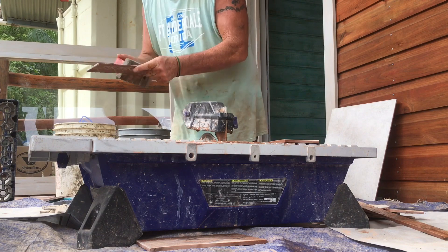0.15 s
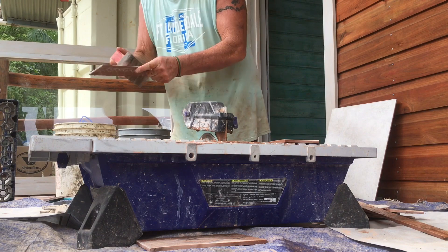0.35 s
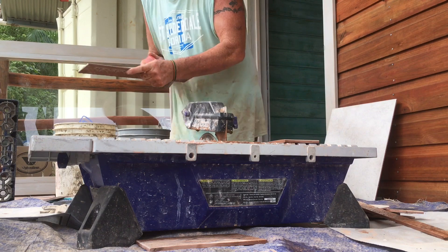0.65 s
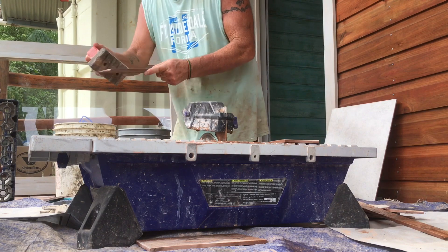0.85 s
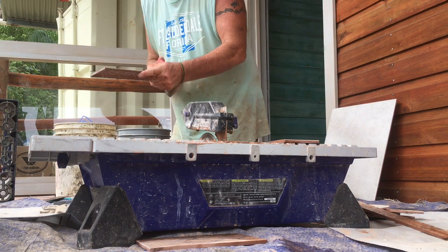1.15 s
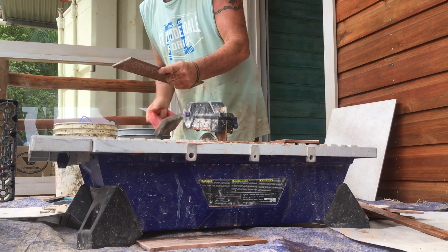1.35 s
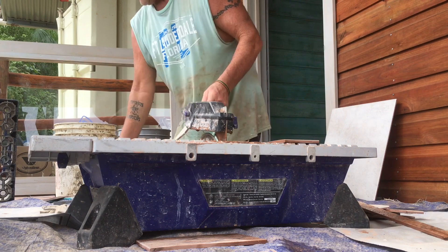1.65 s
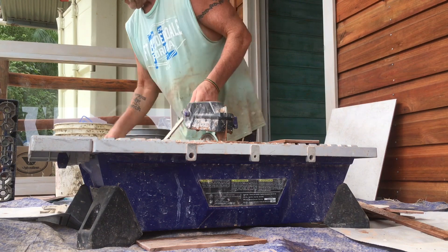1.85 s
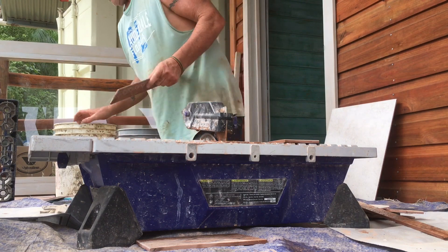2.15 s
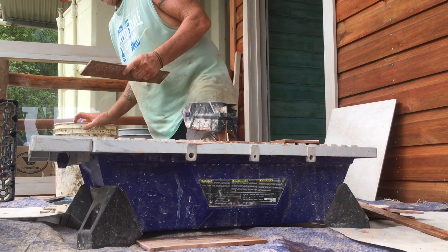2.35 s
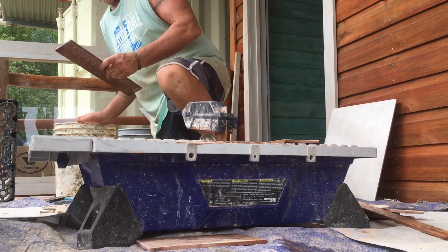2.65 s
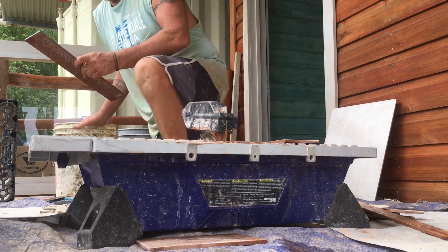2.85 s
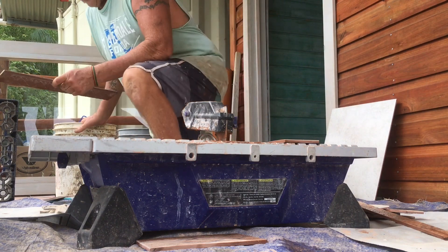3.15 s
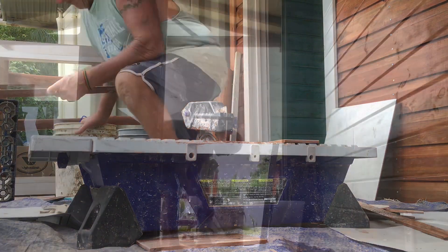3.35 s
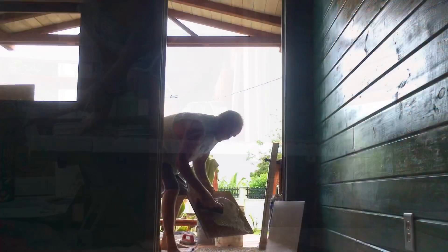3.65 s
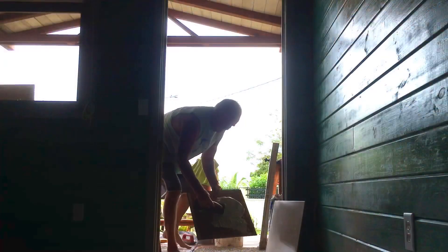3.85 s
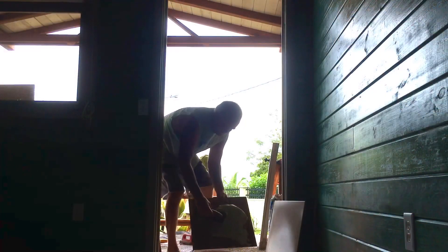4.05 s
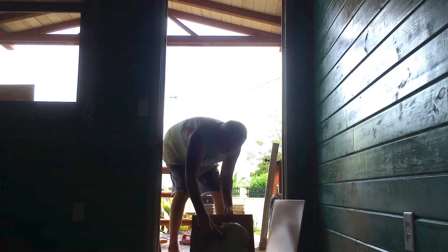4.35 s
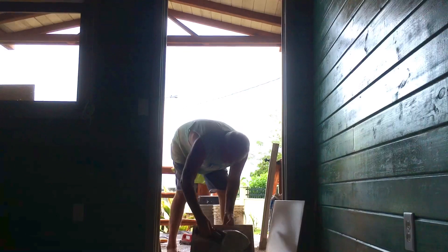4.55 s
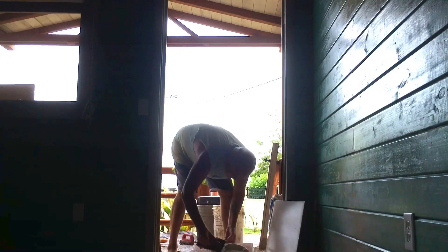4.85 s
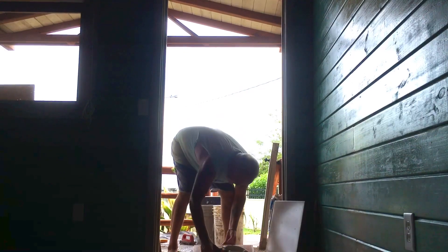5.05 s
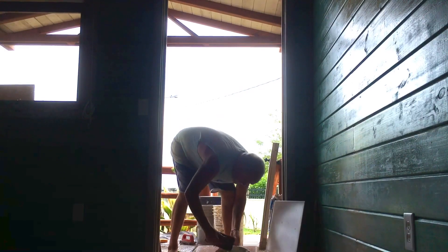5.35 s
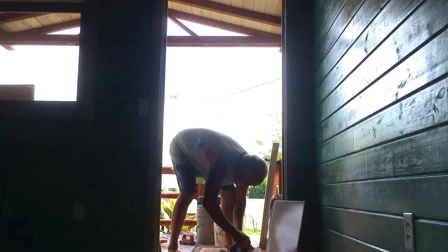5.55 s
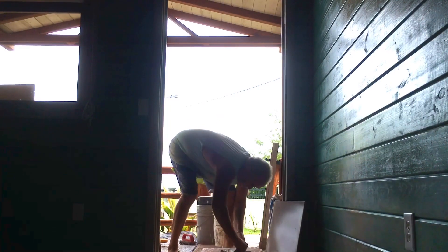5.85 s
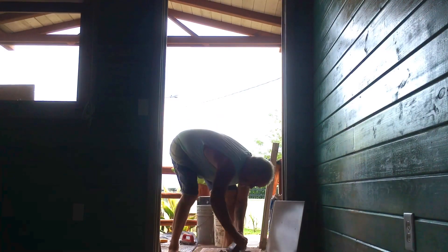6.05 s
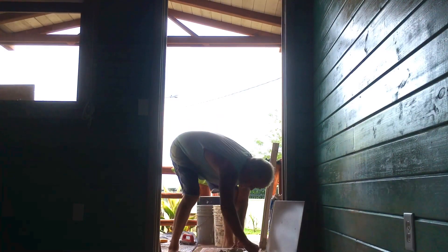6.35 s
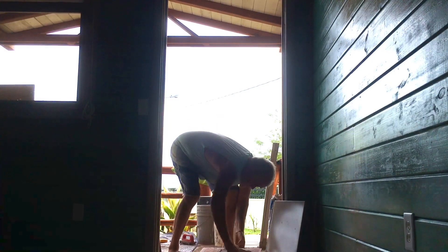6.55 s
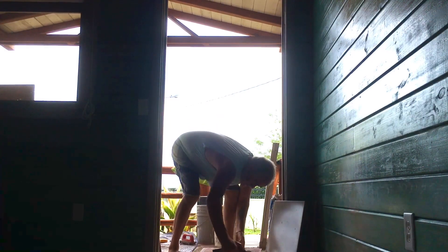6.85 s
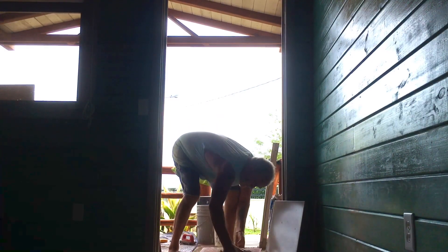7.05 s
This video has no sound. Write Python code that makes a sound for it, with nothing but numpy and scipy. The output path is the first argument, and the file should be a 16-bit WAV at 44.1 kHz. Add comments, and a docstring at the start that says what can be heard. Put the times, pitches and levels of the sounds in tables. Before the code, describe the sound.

From the start to about 1.4 seconds, a rubbing stone makes four quick gritty strokes along a tile's edge, with a bright, shifting ring. A low engine drones over outdoor porch rumble, rising slightly in pitch, then sinking and fading by 3.8 seconds. Around 1.7 and 1.8 seconds the stone knocks dully onto a bench, followed by soft rustling swells of hiss and a tiny tap at 2.5. Between 3.2 and 3.8 seconds the porch fades into a wooden room with a quiet mains hum. A faint whirr and very faint, high falling chirps come between about 3.8 and 5 seconds. At 4.35 a slab hits the floor with a loud clack and rattles flat as the floorboards boom. Four short gritty scrapes follow near 5.0, 5.7, 6.4 and 7.0 seconds, with softer thuds, a smaller clatter at 5.8 and a short room echo.

```python
"""Rubbing a tile, then a dropped slab

On a porch a rubbing stone is drawn four times along a tile's edge, its grit making the tile ring,
and is put down on a bench while an engine drones by. The porch fades into a wooden room with a
mains hum. A slab drops and rattles flat, the floorboards thud, and a gritty surface is wiped in
four strokes. Under it all are swells of fine hiss, a faint whirr and a few high chirps."""
import sys
import numpy as np
from scipy import signal
from scipy.fft import rfft, irfft
from scipy.io import wavfile
from scipy.ndimage import uniform_filter1d

SR = 44100
rng = np.random.default_rng(int(sys.argv[2]) if len(sys.argv) > 2 else 0)


def output_pcm(signal):
    """Save a mono or channel-first signal as 16-bit PCM at the path in sys.argv[1].

    Samples are clipped to [-1, 1] before scaling.
    """
    pcm = np.clip(np.atleast_2d(signal).T, -1, 1) * 32767
    wavfile.write(sys.argv[1], SR, np.round(pcm).astype(np.int16))


N = 317079
TIME = np.arange(N) / SR


def amp(db):
    """Turns decibels into a factor to multiply by."""
    return 10 ** (np.asarray(db) / 20)


def unit_level(x):
    """Scales x to an average (RMS) level of one."""
    return x / np.sqrt(np.mean(x ** 2) + 1e-20)


def look_up(points, hz):
    """Reads a list of (frequency, value) points at the frequencies hz."""
    f, value = np.transpose(points)
    return np.interp(np.log(hz + 1), np.log(f + 1), value)


def curves(rows):
    """Joins rows that start with a time into a time axis and one curve per further column."""
    times, *columns = np.transpose(rows)
    t = np.arange(times[0], times[-1], 1 / SR)
    return [t] + [np.interp(t, times, column) for column in columns]


def add(mix, start, sound):
    """Adds a sound to the mix, start seconds in."""
    part = mix[round(start * SR):][:len(sound)]
    part += sound[:len(part)]


def colour(x, spectrum):
    """Filters x by (frequency, dB) points and sets its level to one."""
    gain = amp(look_up(spectrum, np.fft.rfftfreq(len(x), 1 / SR)))
    return unit_level(irfft(rfft(x) * gain, len(x)))


def resonate(x, hz, width):
    """Makes x ring around hz, which may glide; a smaller width (Hz) rings longer."""
    spin = np.exp(2j * np.pi * np.cumsum(hz * np.ones(len(x))) / SR)
    decay = np.exp(-np.pi * width / SR)
    return 2 * (spin * signal.lfilter([1 - decay], [1, -decay], x / spin)).real


def wander(length, per_s):
    """A smooth random curve of size one that changes about per_s times a second."""
    size = max(int(SR / per_s), 2)
    return unit_level(uniform_filter1d(uniform_filter1d(rng.standard_normal(length), size), size))


def grit(length, spread_db, flicker_db, per_s):
    """Dense grains of uneven size under a flickering pressure."""
    grain_db = spread_db * np.minimum(rng.exponential(1, length), 4)
    sizes = amp(grain_db + flicker_db * wander(length, per_s))
    return unit_level(rng.standard_normal(length) * sizes)


def tilt(x, treble_db):
    """Tips the balance between what lies above and below 4 kHz."""
    low = signal.sosfilt(signal.butter(1, 4000, fs=SR, output="sos"), x)
    return (low + amp(treble_db) * (x - low)) / np.sqrt((1 + amp(2 * treble_db)) / 2)


def stone_on_tile():
    """Grit rings the tile; as stone and grip shift, each of its tones swells, fades and bends."""
    # strokes: start/s, length/s, place of hardest push/0-1, push level/dB, start level/dB, treble/dB
    rubs = [(0.0, 0.2813, 0.36, -17.5, -42, 1.5), (0.289, 0.2972, 0.57, -18, -40.5, 0),
            (0.567, 0.37, 0.45, -17, -39, 3.5), (0.94, 0.35, 0.48, -14.5, -40, 3)]
    # the tones the tile rings at: f/Hz
    tile_hz = [1150, 1280, 1407, 1547, 1800, 2250, 2696, 3225, 3572, 3962, 4243, 4560, 4865, 5454, 5808,
               6015, 6285, 6780, 6925, 7445, 8215, 9190, 9640, 10200, 11150, 12400, 12800, 13600, 15100]
    # for each of those tones: twice its width/Hz, relative level/dB
    tile_tones = [(49.1, -20.5), (50, -2.5), (68, -3.5), (50, -3), (80, -9), (80, -8.5), (72, -1),
                  (70, -11), (66, -8), (60.4, -5), (40, -16), (75, -10.5), (70, -14), (50, -9),
                  (90.7, -6.5), (45, -5), (45, -6.5), (60, -3.5), (60, -10.5), (26, -5), (139, -12.5),
                  (100, -8), (82, -14.5), (50, -27.5), (170, -14.5), (60, -15), (90, -16.5), (240, -16.5),
                  (230, -19.5)]
    # the hiss between the tones: f/Hz, relative level/dB
    grit_spectrum = [(210, -55.5), (350, -27), (1120, -4.5), (1380, -5), (2350, -6.5), (2750, -13.5),
                     (3030, -9.5), (4110, -10), (5140, -14.5), (6850, -9), (16000, -20.5)]
    bite_db_per_s, ease_db_per_s, lift_db_per_s, end_db = 327, 51, 292, -40.5
    t = TIME[:round(1.45 * SR)]
    start, length, place, push_db, start_db, bright_db = np.transpose(rubs)[:, :, None]
    bite_db = start_db + bite_db_per_s * (t - start)
    middle_db = push_db - ease_db_per_s * abs(t - start - place * length)
    lift_db = end_db + lift_db_per_s * (start + length - t)
    strokes_db = np.minimum(middle_db, np.minimum(bite_db, lift_db))
    level_db, stroke = strokes_db.max(0), strokes_db.argmax(0)  # the loudest stroke takes over
    dulling_db = 0.24 * np.maximum(level_db - push_db, -40)  # a lighter push sounds duller
    treble_db = (bright_db + dulling_db)[stroke, np.arange(len(t))]
    grip_db = 1.4 * rng.standard_normal((len(tile_tones), len(rubs)))  # new for each stroke
    grains = grit(len(t), spread_db=0.5, flicker_db=1.0, per_s=163)
    out = amp(level_db - 4.5) * colour(grains, grit_spectrum)
    for k, (hz, (double_width, db)) in enumerate(zip(tile_hz, tile_tones)):
        swing_db = 4.2 * wander(len(t), 34)
        bend = 1 + 0.0049 * wander(len(t), 9.5)
        drive = amp(level_db + swing_db + grip_db[k, stroke]) * grains
        width = double_width / 2
        size = np.sqrt(np.mean(resonate(grains, hz, width) ** 2) / double_width)
        out += (-1) ** k * amp(db - 29) * resonate(drive, hz * bend, width) / size
    return np.pad(tilt(out, treble_db), (0, N - len(t)))


def engine():
    """An engine drones at one, two and three times its firing rate, with a slight flutter."""
    # the passing engine: t/s, firing rate/Hz, first tone/dB, second tone/dB
    drone = [(0.0, 72.0, -35, -39), (0.05, 71.8, -32.5, -41.5), (0.31, 71.7, -29, -33.5),
             (0.62, 76.7, -24, -36), (0.82, 82.34, -33.5, -44.5), (0.95, 81.4, -27.5, -35),
             (1.3, 85.6, -37.5, -44.5), (1.47, 85.62, -20.5, -41), (1.61, 86.5, -29, -61),
             (1.7, 81.6, -36, -46), (1.75, 81.1, -33, -35.5), (2.04, 84.4, -32, -50), (2.4, 80.6, -26, -37),
             (2.62, 75.0, -26.5, -40.5), (2.87, 75.0, -26, -36), (2.97, 73.6, -26, -45.5),
             (3.33, 64.16, -29, -34.5), (3.52, 60.77, -42.5, -47), (3.78, 58.5, -49, -44),
             (3.8, 58.7, -39, -67)]
    exhaust_hz, exhaust_width_hz = 260, 10
    t, hz, first_db, second_db = curves(drone)
    turns = np.cumsum(hz * (1 + 0.0041 * wander(len(t), 13))) / SR
    # the third tone comes and goes, and is strongest near the exhaust's own pitch
    off_pitch = (3 * hz - exhaust_hz) / exhaust_width_hz
    third_db = -43 - 20 * np.log10(1 + off_pitch ** 2) + 2.5 * wander(len(t), 5.8)
    out = np.zeros(len(t))
    for multiple, db in enumerate([first_db, second_db, third_db], 1):
        level = np.sqrt(2) * amp(db + 0.79 * wander(len(t), 23))
        out += level * np.sin(2 * np.pi * (multiple * turns + rng.random()))
    fade_out = np.clip((t[-1] - t) / 0.17, 0, 1)
    return np.pad(out * fade_out, (0, N - len(t)))


def air(spectrum, db, patchy_db):
    """Background noise with drifting louder and softer patches."""
    frames, hz = N // 512 + 5, np.fft.rfftfreq(2048, 1 / SR)
    real, imag, patches = rng.standard_normal((frames, len(hz), 3)).T
    patches = uniform_filter1d(patches, size=20, axis=0)  # smooth across pitch
    patches = unit_level(uniform_filter1d(patches, size=8, axis=1))  # and across time
    spectra = (real + 1j * imag) * amp(look_up(spectrum, hz)[:, None] + patchy_db * patches)
    return amp(db) * unit_level(signal.istft(spectra, nperseg=2048, noverlap=1536)[1][:N])


def yard_air():
    """The low outdoor rumble around the porch."""
    # outdoor noise: f/Hz, relative level/dB
    spectrum = [(12, -48.5), (20, -25), (32, -17.5), (55, -5.5), (81, -12), (98, -14), (120, -11.5),
                (158, -12), (446, -29), (1030, -31.5), (1400, -35), (2320, -39), (4940, -48),
                (11400, -52.5), (16000, -60.5)]
    return air(spectrum, db=-36.5, patchy_db=2.0)


def hiss_swells():
    """Swells of fine, grainy hiss: cloth rustles, the clatter's bright hiss, the first wipe's tail."""
    # swells: peak t/s, level/dB, time to rise 20 dB/s, time to fall 20 dB/s
    swishes = [(1.7, -40.5, 0.026, 0.056), (1.82, -43, 0.022, 0.055), (2.32, -42, 0.24, 0.11),
               (2.55, -51, 1.19, 0.99), (2.82, -40.5, .12, .11), (3.17, -52, .04, 0.17),
               (3.61, -53.5, 0.058, .1), (3.77, -59, .04, 0.053), (3.88, -49.5, 0.068, .08),
               (4.0, -57, .2, 0.58), (4.18, -47, .06, 0.38), (4.36, -51, .02, 0.16),
               (4.555, -53.5, 0.067, .08), (4.75, -58.5, .5, 0.66), (5.4, -49, 0.26, 0.57)]
    # the tone colour of the hiss: f/Hz, relative level/dB
    spectrum = [(1470, 2.5), (2500, -2), (3080, -4), (4840, -8), (8940, -2.5), (10400, -5.5), (11100, -2.5),
                (14200, -4), (16000, 3)]
    swells = sum(amp(db - 20 * np.maximum((peak - TIME) / rise, (TIME - peak) / fall))
                 for peak, db, rise, fall in swishes)
    return swells * colour(grit(N, spread_db=3.0, flicker_db=1.3, per_s=60), spectrum)


def bench_knocks():
    """Stone and hand meet the bench: a short dull ring of two close tones, and a scuff."""
    # knocks: t/s, ring level/dB, f/Hz, time to fall 60 dB/s, relative scuff level/dB
    knocks = [(1.685, -35.5, 577, .08, -24), (1.696, -29.5, 1419, 0.031, -28),
              (1.71, -47, 1470, 0.044, -31), (1.82, -23, 883, 0.057, -26.5), (1.829, -31, 1636, 0.04, -29),
              (1.835, -18.5, 288.4, 0.15, -45.), (2.519, -40, 1235, 0.061, -51)]
    out, t = np.zeros(N), np.arange(8000) / SR
    for start, db, hz, ring_s, scuff_db in knocks:
        partner = 0.51 * np.sin(2 * np.pi * hz * 1.13 * t) * amp(-60 * t / 0.23)
        ring = amp(db - 60 * t / ring_s) * (np.sin(2 * np.pi * hz * t) + partner)
        noise = unit_level(resonate(resonate(rng.standard_normal(len(t)), 890, 1500), 930, 2750))
        scuff = 0.476 * amp(scuff_db - 60 * t / 0.064) * noise
        add(out, start, np.minimum(t * hz / 0.59, 1) * (ring + scuff))
    return out


def reverb(x):
    """The echo of x: a tail of noise in which each pitch dies at its own speed."""
    # length of the echo: f/Hz, time to fall 60 dB/s
    echo_times = [(100, 0.58), (500, 0.71), (2000, 0.41), (4000, 0.37), (8000, 0.103)]
    hz, t, spectra = signal.stft(rng.standard_normal(SR // 2), SR, nperseg=256)
    decay = amp(-60 * t / look_up(echo_times, hz)[:, None])
    tail = signal.istft(spectra * decay, SR, nperseg=256)[1]
    return signal.fftconvolve(x, tail / np.linalg.norm(tail))[:N]


def room_air_and_hum():
    """Steady mains tones over the room's low background noise."""
    # mains hum: f/Hz, level/dB
    tones = [(59.2, -46.5), (177.6, -58), (296.1, -54.5)]
    # indoor noise: f/Hz, relative level/dB
    spectrum = [(25, -12), (55, -1), (95, -3), (134, -6), (221, -12.5), (295, -13.5), (450, -23),
                (800, -22.5), (1300, -24), (2200, -31.5), (3500, -38.5), (5000, -45.5), (9000, -47.5),
                (16000, -57)]
    hum = sum(np.sqrt(2) * amp(db) * np.sin(2 * np.pi * (hz * TIME + rng.random())) for hz, db in tones)
    return hum + air(spectrum, db=-41.5, patchy_db=1.16)


def whirr():
    """A faint, narrow band of noise that rises a little in pitch."""
    # the whirr's course: t/s, f/Hz, level/dB
    course = [(3.8, 1500, -61), (3.95, 1555, -63), (4.2, 1567, -49.5), (4.3, 1560, -65)]
    out = np.zeros(N)
    t, hz, db = curves(course)
    band = resonate(resonate(rng.standard_normal(len(t)), hz, 148), hz, 173)
    add(out, t[0], amp(db) * unit_level(band))
    return out


def chirps():
    """Faint, very high whistles of noise that slide downward."""
    # chirps: start/s, length/s, level at the middle/dB
    whistles = [(3.86, .14, -72), (4.03, .1, -66), (4.174, 0.15, -69), (4.486, 0.123, -65),
                (4.698, .18, -60.5), (4.847, .11, -67)]
    start_hz, fall_hz_per_s = 9700, 8900
    out = np.zeros(N)
    for start, length, db in whistles:
        t = np.arange(0, length, 1 / SR)
        band = resonate(rng.standard_normal(len(t)), start_hz - fall_hz_per_s * t, width=550)
        add(out, start, amp(db) * unit_level(band) * np.hanning(len(t)))
    return out


def hard_clacks():
    """Hard hits: a few milliseconds of shock drive one broad ring. The first three are the slab's edges
    striking the floor; the last three are a knock during the second wipe."""
    # hits: t/s, ring peak/dB, f/Hz, width/Hz, level of the bare shock/dB
    clacks = [(4.3452, -9.5, 1590, 610, -21.5), (4.451, -20.5, 2210, 2000, -58),
              (4.481, -29, 1590, 900, -64), (5.792, -17.5, 1870, 800, -60.), (5.803, -22.5, 2500, 800, -59),
              (5.822, -22, 1490, 700, -60.)]
    out, t = np.zeros(N), np.arange(2000) / SR
    for start, db, hz, width, shock_db in clacks:
        shock = rng.standard_normal(len(t)) * amp(-60 * t / 0.012) * np.minimum(t / 0.002, 1)
        ring = resonate(resonate(shock, hz, width), hz, 2 * width)
        add(out, start, amp(db) * ring / abs(ring).max() + amp(shock_db) * shock)
    return out


def slab_clatter():
    """Dense small bounces: the slab rattles until it lies flat, and a brief gritty rattle goes with the knock
    during the second wipe."""
    # rattles: start/s, first bounce/dB, rattle level/dB, rattle length/s
    rattles = [(4.345, -17.5, -27.5, 0.14), (5.789, -31, -35.5, 0.042)]
    # the slab's tone colour: f/Hz, relative level/dB
    spectrum = [(180, -28), (300, -2.5), (462, -22), (583, -10), (649, -18.5), (769, -9.5), (970, -15.5),
                (1110, -8), (1260, -14), (1720, -15), (2200, -19), (6000, -40), (12000, -57),
                (16000, -57.5)]
    bounce_db_per_s, settle_db_per_s = 169, 153
    out, t = np.zeros(N), np.arange(SR // 2) / SR
    for start, first_db, rattle_db, length in rattles:
        settling_db = rattle_db - settle_db_per_s * np.maximum(t - length, 0)
        level_db = np.maximum(first_db - bounce_db_per_s * t, settling_db)
        bounces = colour(grit(len(t), spread_db=2.5, flicker_db=1.5, per_s=250), spectrum)
        add(out, start, amp(level_db) * bounces * np.minimum(t / 0.0054, 1))
    return out


def floor_thuds():
    """Weight lands and the floorboards boom; a harder blow reaches their higher tones."""
    # landings: t/s, level/dB, hardness/dB per octave
    thuds = [(4.347, -15.5, 3), (4.375, -14.5, 0), (4.414, -17, 2), (4.453, -28, 2.5), (4.481, -17.5, 2.5),
             (4.562, -23, -5), (5.055, -28.5, -23), (5.235, -28, -23), (5.798, -31, 2.5), (5.821, -26, 0),
             (5.929, -32, -14), (6.027, -46, 2), (6.521, -39, -10), (6.821, -37, -1.5), (7.039, -45, -11)]
    # the floor's tones: f/Hz, relative level/dB, time to fall 60 dB/s
    boards = [(58.3, 6.5, 0.32), (72.4, -4, 0.48), (102.4, -5.5, 0.307), (158, -0.5, 0.28),
              (202, -10, 0.123), (294, -9.5, 0.19), (350, -22.5, 0.16), (620, -23.5, 0.3)]
    out, t = np.zeros(N), np.arange(SR // 2) / SR
    swell = 1 - np.exp(-t / 0.0085)
    for start, level_db, hardness in thuds:
        for hz, db, ring_s in boards:
            level = amp(level_db + db + hardness * np.log2(hz / 65) - 60 * t / ring_s)
            add(out, start, swell * level * np.sin(2 * np.pi * (hz * t + 0.49 * rng.random())))
    return out


def wiping():
    """A tick at first touch, then fine grit is dragged over a surface that rasps."""
    # strokes: first touch/s, relative tick level/dB, resting level/dB, wait/s, rise/s, hold/s,
    # drag level/dB, treble/dB
    strokes = [(5.0268, -20, -37.5, 0.025, 0.029, 0.075, -26, 6),
               (5.739, -24, -39.5, 0.059, 0.02, .05, -37.5, 10),
               (6.375, -34, -40, 0.0023, 0.095, 0.099, -26, 7.5),
               (7.016, -38, -46.5, .004, 0.061, 0.057, -29.5, 4.5)]
    # the hiss of dragged grit: f/Hz, relative level/dB
    spectrum = [(180, -43), (300, -24.5), (372, -5), (519, -14.5), (700, -2.5), (930, 0.5), (1480, 3),
                (1660, -1), (1930, 3.5), (2250, -4), (4830, -13), (6000, -8), (10400, -7.5), (13100, -4),
                (16000, -8)]
    # the tones the surface rings at: f/Hz, width/Hz, relative level/dB
    surface_tones = [(860, 970, 5), (1610, 570, -25), (1840, 73, -27), (2440, 37, -13), (2900, 93, 7),
                     (3210, 84, 6.5), (4080, 140, -12), (4400, 72, 5), (4940, 19, -38), (5700, 250, -2),
                     (6350, 100, 2), (6030, 220, 1)]
    rest_sag_db_per_s, release_db_per_s, dulling_db_per_s = 100, 155, 12
    out, t = np.zeros(N), np.arange(SR // 2) / SR
    tick_t, onset = t[:600], np.minimum(t / 0.0022, 1)
    for start, tick_db, rest_db, wait, rise, hold, drag_db, treble_db in strokes:
        push = np.clip((t - wait) / rise, 0, 1)
        release_db = release_db_per_s * np.maximum(t - wait - rise - hold, 0)
        level_db = (rest_db - rest_sag_db_per_s * t) * (1 - push) + drag_db * push - release_db
        grains = grit(len(t), spread_db=2.5, flicker_db=1.6, per_s=72)
        rasp = np.zeros(len(t))
        for hz, width, db in surface_tones:
            level = amp(db + 6.1 * wander(len(t), 29)) * np.sqrt(width)
            rasp += level * unit_level(resonate(grains, hz, width))
        drag = unit_level(colour(grains, spectrum) + amp(-12) * unit_level(rasp))
        add(out, start, onset * amp(level_db) * tilt(drag, treble_db - dulling_db_per_s * t))
        bright_noise = np.diff(rng.standard_normal(len(tick_t) + 1))
        add(out, start, 0.27 * amp(tick_db - 60 * tick_t / 0.011) * bright_noise)
    return out


def scene():
    """Mixes everything to one channel; the porch's background fades into the room's."""
    fade_start_s, fade_end_s = 3.22, 3.8
    inside = np.clip((TIME - fade_start_s) / (fade_end_s - fade_start_s), 0, 1)
    clacks, knocks, wipes = hard_clacks(), bench_knocks(), wiping()
    porch = stone_on_tile() + engine() + knocks + amp(-13) * reverb(knocks) + (1 - inside) * yard_air()
    room_echo = reverb(amp(-7.5) * clacks + amp(-10.5) * wipes)
    room = clacks + slab_clatter() + floor_thuds() + wipes + room_echo + inside * room_air_and_hum()
    return (porch + room + hiss_swells() + whirr() + chirps())[None]


def record(dry):
    """A small microphone loses the deepest bass; the highest treble is cut off too."""
    low_cut_hz, high_cut_hz = 54.8, 15730
    thin = signal.sosfilt(signal.butter(3, low_cut_hz, "high", fs=SR, output="sos"), dry)
    treble_cut = signal.firwin(1023, high_cut_hz, window=("kaiser", 9), fs=SR)
    return signal.oaconvolve(thin, treble_cut[None], "same")


dry = scene()
out = record(dry)
output_pcm(out)
```